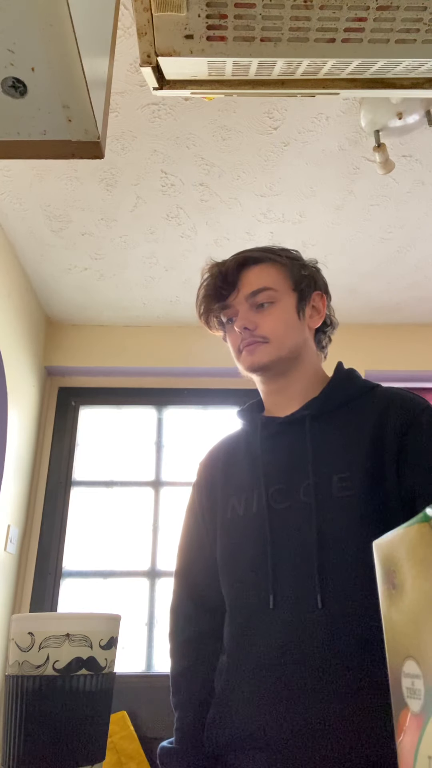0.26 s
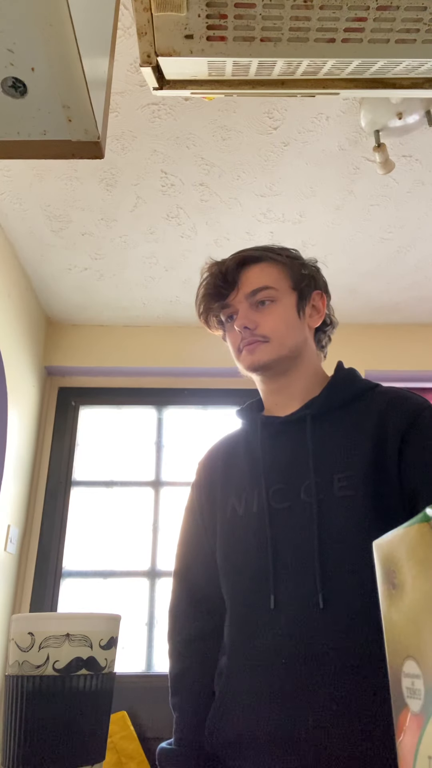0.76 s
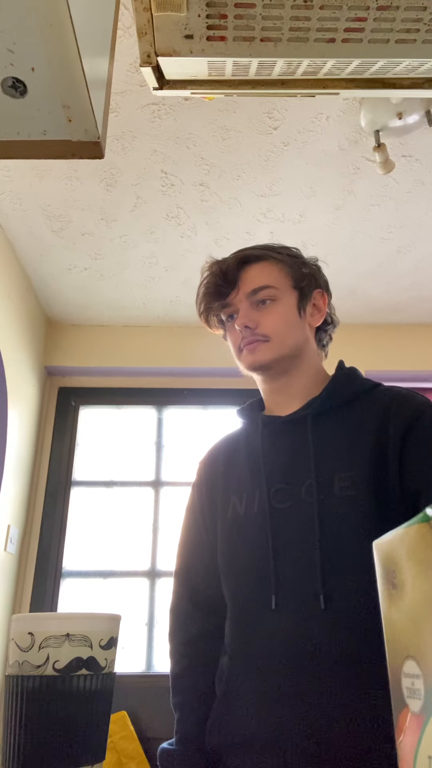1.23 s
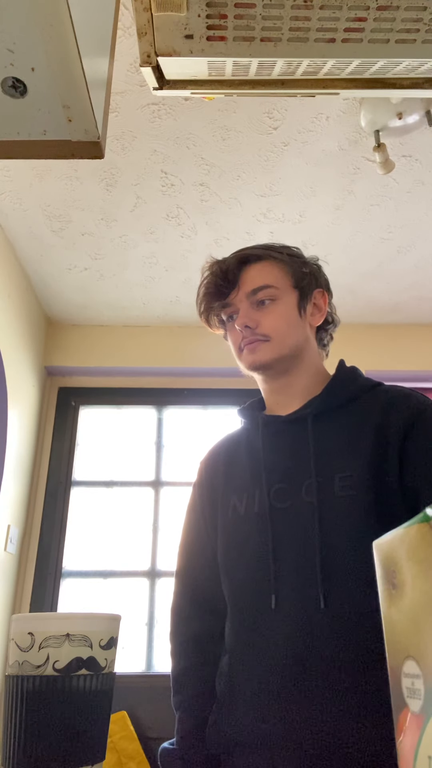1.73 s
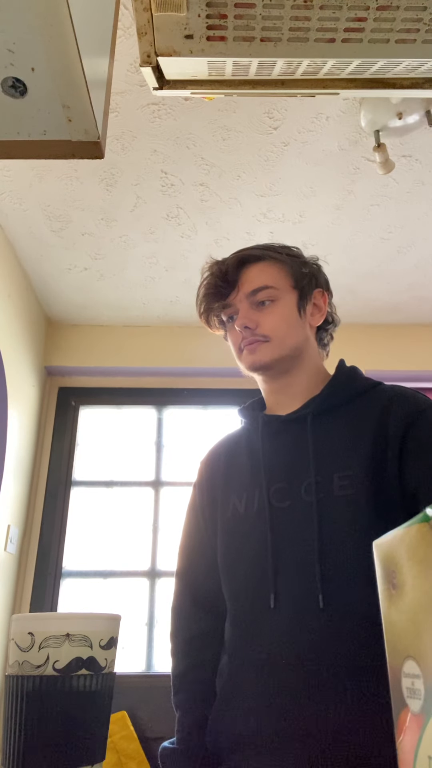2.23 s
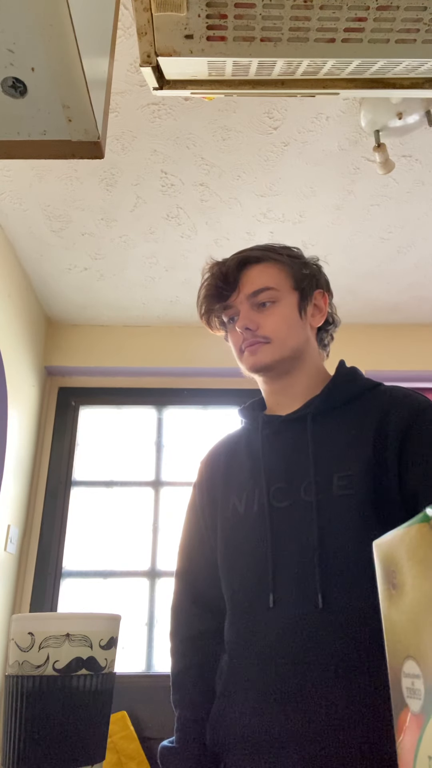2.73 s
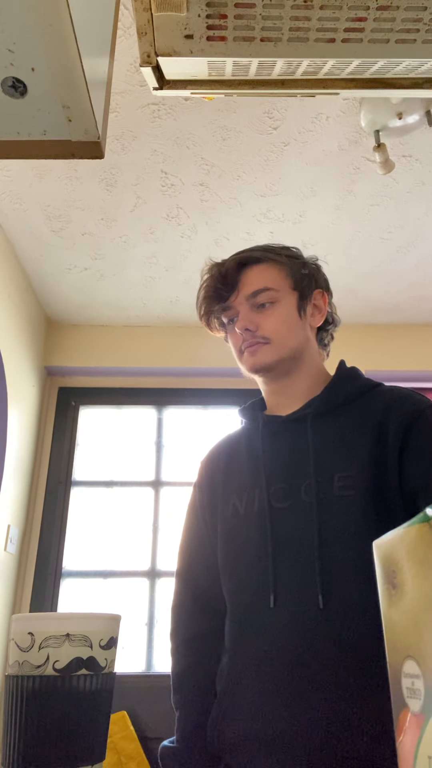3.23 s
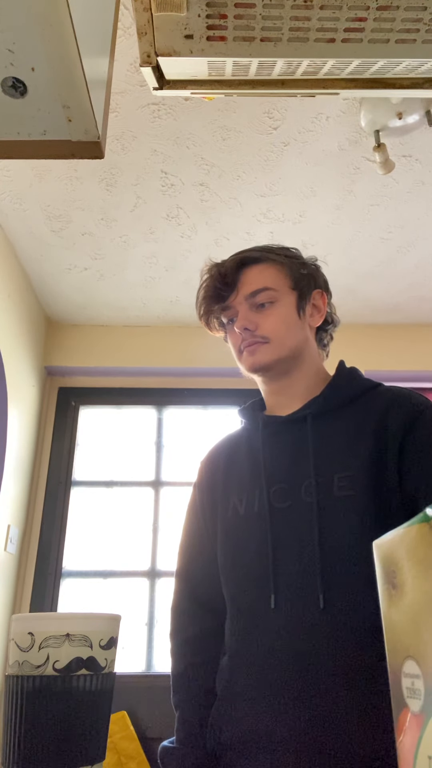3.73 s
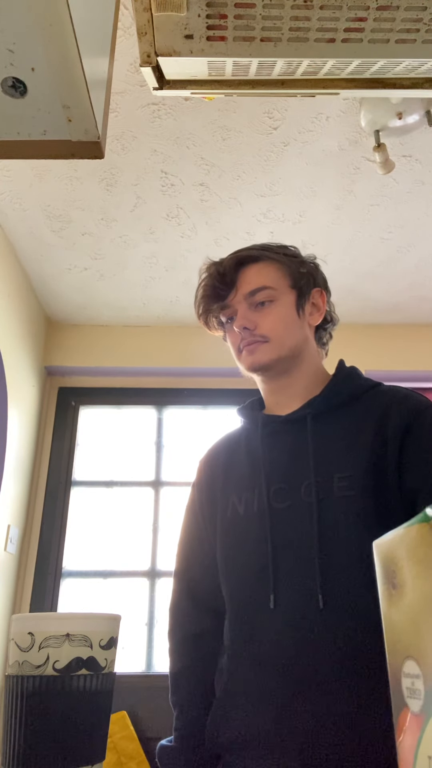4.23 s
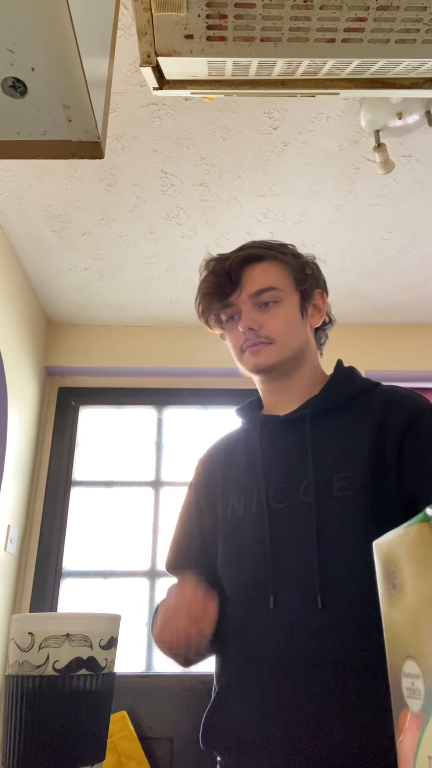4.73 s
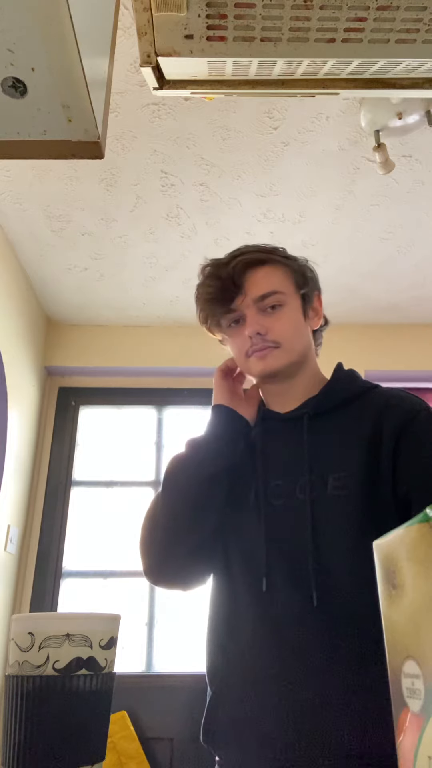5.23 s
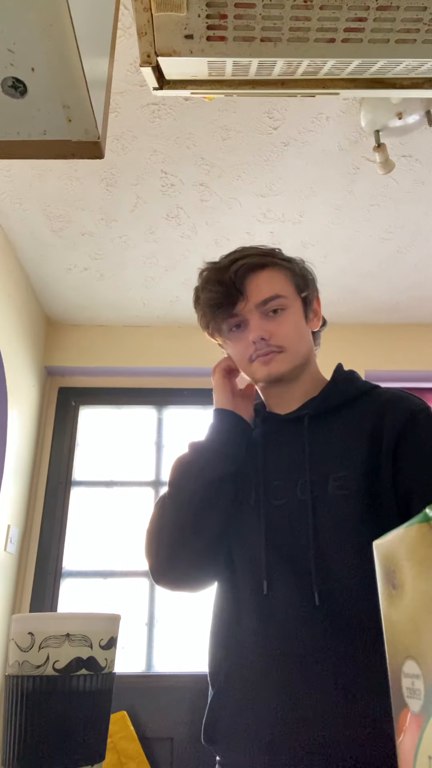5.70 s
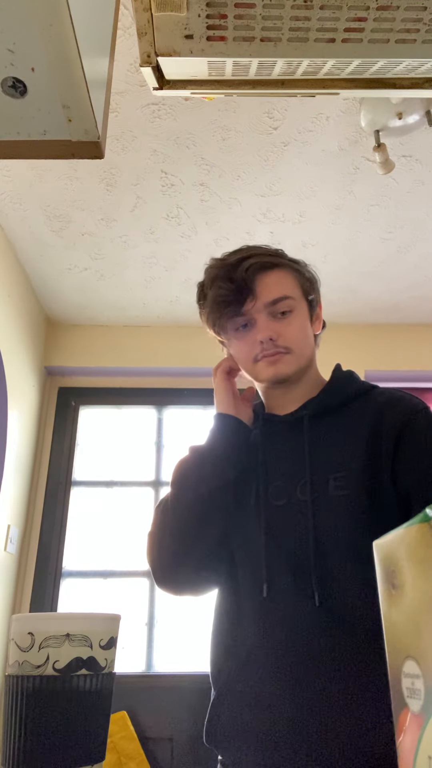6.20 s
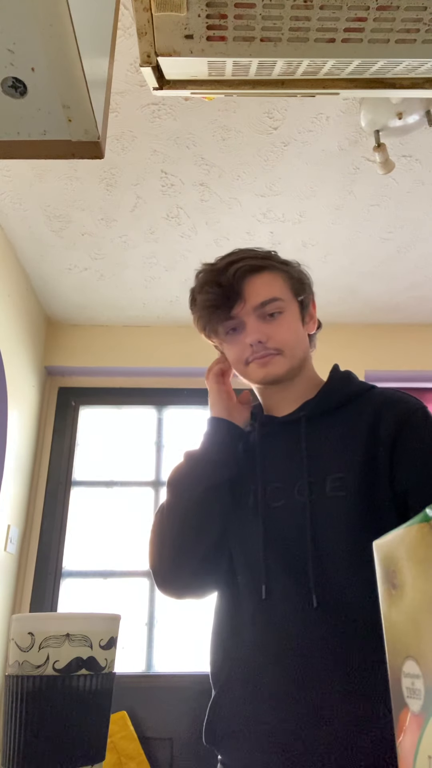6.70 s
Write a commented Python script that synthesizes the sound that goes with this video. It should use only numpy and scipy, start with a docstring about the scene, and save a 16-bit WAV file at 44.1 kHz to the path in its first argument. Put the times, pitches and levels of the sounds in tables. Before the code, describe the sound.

An electric kettle begins heating in a small kitchen, faint quickening ticks merging into a growing crackly sizzle with dull pops over a low fridge hum.

```python
"""An electric kettle starts to heat water in a small kitchen, over the beating hum of a fridge.
One spot on the hot plate ticks faster and faster, then a second; more join until the ticks merge into a sizzle.
Large steam bubbles collapse with dull pops; middling ones simmer low and the finest hiss on top.
Every collapse is a click or a dying burst of noise, filtered by the modes of the same kettle body.
Two faint squeaks slide upward as the plate warms; echoes of the kitchen and a low rumble surround it all."""
import sys
import numpy as np
from scipy import signal
from scipy.fft import rfft, irfft
from scipy.io import wavfile
from scipy.ndimage import uniform_filter1d

SR = 44100
rng = np.random.default_rng(int(sys.argv[2]) if len(sys.argv) > 2 else 0)


def dump_mix(stems):
    """Bounce the given channels to the path in sys.argv[1] as a 16-bit WAV at rate SR."""
    frames = np.atleast_2d(stems).T  # one column per channel
    limited = np.clip(frames, -1, 1)  # hard clip at full scale
    pcm = np.round(limited * 32767).astype(np.int16)
    wavfile.write(sys.argv[1], SR, pcm)


N = 306936
TIME = np.arange(N) / SR

# growing strength of the boiling, before each layer's own trim: start_s, sizzle_db, finest_bubbles_db
BOILING = [(0.0, -76, -87), (0.56, -61, -76), (0.81, -57, -62.5), (1.28, -51.5, -51.5), (2.0, -48.5, -47),
           (2.54, -42.5, -39), (2.95, -39.5, -37.5), (4.63, -32, -35), (5.46, -29.5, -34.5),
           (6.67, -28, -32.5), (6.96, -28.5, -34)]


def amp(db):
    """Decibels to gain."""
    return 10 ** (np.asarray(db) / 20)


def unit(x):
    """Scales to rms 1."""
    return x / np.sqrt(np.mean(x ** 2) + 1e-20)


def read(points, hz):
    """A spectrum table, joined on a log-frequency axis."""
    point_hz, value = np.transpose(points)
    return np.interp(np.log(hz + 1), np.log(point_hz + 1), value)


def curves(rows):
    """The columns of a time table, at every sample."""
    s, *columns = np.transpose(rows)
    return [np.interp(TIME, s, column) for column in columns]


def cut(x, hz, kind, order=2):
    """A causal low-, high- or band-pass."""
    return signal.sosfilt(signal.butter(order, hz, kind, fs=SR, output="sos"), x)


def ring(x, response):
    """Plays x through an impulse response."""
    return signal.oaconvolve(x, response)[:N]


def add(mix, s, sound):
    """Adds a sound at time s."""
    part = mix[max(round(s * SR), 0):][:len(sound)]
    part += sound[:len(part)]


def kettle_body(size=8192):
    """The kettle's answer to one collapse: narrow modes over a broad response, made causal."""
    # resonances of the kettle and its water: pitch_hz, width_hz, level_db
    mode_table = [(233.7, 30, -4.5), (280.5, 112, -7.5), (352, 29, -9), (404, 28, -11), (570.6, 56, -12),
                  (673, 80, -16), (864, 54, -12.5), (940.3, 42, -3), (983.7, 34, -3.5), (1625, 36, -4.5),
                  (1694, 58, -7.5), (1760, 11, -7), (1910, 58, -7.5), (2030, 70, -2.5), (2189, 54, 1),
                  (2393, 34, -2), (2432, 29, 0), (2938, 62, -2), (3012, 58, -0.5), (3073, 140, -4),
                  (3276, 77, -7), (3655, 93, -3.5), (3916, 73, -7.5), (4030, 130, -12), (4182, 117, -5),
                  (4510, 66, -11), (4800, 82, -8), (5056, 230, -10)]
    # broad response between the modes: frequency_hz, level_db
    shell_table = [(30, -42), (100, 3), (135, -9.5), (185, -28), (480, -25), (780, -23.5), (1100, -25.5),
                   (1350, -19.5), (1500, -19), (1750, -9.5), (2500, -6.5), (2700, -18), (3200, -10.5),
                   (4200, -10.5), (5500, -19.5), (7000, -26), (8700, -29.5), (9300, -31), (11500, -30.5)]
    hz = abs(np.fft.fftfreq(size, 1 / SR))
    power = amp(read(shell_table, hz)) ** 2
    for mode_hz, width_hz, db in mode_table:
        detuning = (hz - mode_hz) / width_hz
        power = power + amp(db) ** 2 / (1 + 2 * detuning ** 2) ** 2
    # the Hilbert transform of the log gain gives the minimum phase
    spectrum = np.exp(np.conj(signal.hilbert(np.log(power) / 2)))
    response = np.fft.ifft(spectrum).real[:size // 2]
    return response / np.linalg.norm(response)


def with_knock(body, dry_db):
    """Part of a collapse leaves through the open water without ringing any mode."""
    return body + amp(dry_db) * signal.unit_impulse(len(body))


def splash(t60, size=1500):
    """One collapse: the bubble shatters in a quick flutter of noise that falls 60 dB in t60 seconds."""
    return rng.standard_normal(size) * np.exp(-np.log(1000) * np.arange(size) / SR / t60)


def crest(x, size=176):
    """Scales a blow so that its loudest 4 ms have rms 1."""
    return x / np.sqrt(uniform_filter1d(x ** 2, size).max())


def blow(colour, t60, flutter_db):
    """One collapse through a colour: a sharp click, then the flutter of the shattering bubble."""
    flutter = splash(t60)
    flutter *= amp(flutter_db) / np.linalg.norm(flutter)  # energy against the click
    collapse = signal.unit_impulse(len(flutter)) + flutter
    return crest(signal.fftconvolve(colour, collapse))


def strikes(s, db):
    """Single clicks at the given times."""
    samples = np.clip(np.round(s * SR).astype(int), 0, N - 1)
    return np.bincount(samples, amp(db), N)


def collapses(per_s, spread_db, size=6001):
    """Random clicks of uneven size, whose power is steady over about a seventh of a second."""
    sizes = amp(spread_db * np.clip(rng.standard_normal(N), -2.5, 2.5))
    signs = rng.choice([-1, 1], N)
    clicks = sizes * signs * (rng.random(N) < per_s / SR)
    power = uniform_filter1d(uniform_filter1d(clicks ** 2, size), size // 2)
    return clicks / np.sqrt(abs(power) + 1e-6)


def scatter(clicks, colour, t60):
    """Turns every click into a splash of its own, of the same energy, which rings the kettle."""
    keep = np.exp(-2 * np.log(1000) / SR / t60)  # share of the power left after one sample
    power = signal.lfilter([1 - keep], [1, -keep], clicks ** 2 + 1e-20)
    return ring(np.sqrt(power) * rng.standard_normal(N), colour / np.linalg.norm(colour))


def early_ticks(body, level_db=-1.0, low_hz=900, top_hz=5500, dry_db=-9, t60=.018, flutter_db=2):
    """Tiny bubbles leave the first two hot spots, each quickening, their ticks interleaved and mostly
    growing louder: a dry tick and a little ring."""
    # single ticks, before the trim level_db: start_s, level_db
    tick_table = [(.174, -76), (.224, -75), (.276, -77), (.317, -70), (.357, -65), (.395, -65), (.426, -61),
                  (.46, -63), (.493, -60), (.522, -62), (.537, -57), (.551, -62), (.578, -62), (.601, -59),
                  (0.621, -54.5), (0.641, -54), (.66, -53), (0.68, -56), (.688, -52), (.7, -53), (.72, -58),
                  (.744, -51.5), (.765, -54), (.785, -55), (.797, -51), (.824, -52), (0.848, -52),
                  (.866, -51), (.892, -50), (.907, -53), (0.924, -50.5), (.938, -51), (.952, -55),
                  (.976, -50), (.99, -51), (1.014, -45.5), (1.036, -50), (1.052, -46), (1.076, -51),
                  (1.088, -45.5), (1.123, -56), (1.159, -47), (1.192, -43), (1.215, -48), (1.233, -42),
                  (1.264, -48), (1.287, -48), (1.316, -51), (1.342, -50), (1.365, -52), (1.382, -47),
                  (1.412, -43), (1.43, -47), (1.456, -46), (1.48, -45), (1.5, -48), (1.521, -47),
                  (1.543, -48), (1.563, -49), (1.601, -41.5), (1.659, -41), (1.686, -43)]
    colour = cut(cut(with_knock(body, dry_db), low_hz, "high"), top_hz, "low")
    out = np.zeros(N)
    for s, db in tick_table:
        add(out, s, blow(colour, t60, flutter_db) * amp(db + level_db))
    return out


def hot_spots(body, level_db=25, quickening=.3, jitter=.1, spread_db=2.5,
              low_hz=900, top_hz=6000, t60=0.024, count=600):
    """Each further spot sheds bubbles at its own pace, which quickens as the plate warms."""
    # further hot spots, before the trim level_db: start_s, first_ticks_per_s, level_db
    spot_table = [(1.58, 32, -57), (1.71, 18.8, -47.5), (1.899, 32, -54.5), (2.329, 26, -43),
                  (2.551, 48, -53.5)]
    clicks = np.zeros(N)
    for start, per_s, db in spot_table:
        slip, size = rng.standard_normal((2, count))
        even = np.cumsum(np.exp(jitter * slip)) / per_s  # tick times at an unhurried pace
        # the pace grows by a factor e in 1 / quickening seconds
        s = start + np.log1p(quickening * (even - even[0])) / quickening
        heard = s < TIME[-1]
        clicks += strikes(s[heard], db + level_db + spread_db * size[heard])
    return scatter(clicks, cut(body, [low_hz, top_hz], "band", order=1), t60)


def sizzle(body, level_db=1, spread_db=1.5, low_hz=520, top_hz=6200, t60=0.0058, surge_db=0.66, surge_hz=14):
    """Ever more small bubbles collapse, in little surges, until single ticks merge."""
    first_per_s, doubling_s = 600, 2.2
    cold_db, warm_s = -37, .68  # the swarm starts low and fills up with this time constant
    per_s = first_per_s * 2 ** (TIME / doubling_s)
    share_db = cold_db * np.exp(-TIME / warm_s)
    colour = cut(cut(body, low_hz, "high", order=1), top_hz, "low")
    surges = unit(cut(rng.standard_normal(N), surge_hz, "low"))
    level = amp(curves(BOILING)[0] + share_db + level_db + surge_db * surges)
    return scatter(collapses(per_s, spread_db) * level, colour, t60)


def pops(body, thump_db=-1, ring_db=-2, snap_db=-4, dry_db=-7, low_hz=190, dull_hz=520,
         ring_hz=770, snap_hz=1480, top_hz=3000, lag_s=0.00204, flutter_db=8):
    """A large bubble snaps and rings the kettle wall, and a moment later its thump stirs the low modes."""
    # the largest bubbles, before the trims above: start_s, thump_db, ring_db, snap_db
    pop_table = [(1.636, -48, -52.5, -37), (1.775, -55, -52, -43), (2.012, -47, -48, -38),
                 (2.156, -48.5, -42.5, -37), (2.359, -50.0, -45, -35), (2.504, -64.0, -45.5, -46.5),
                 (2.57, -46, -38, -35), (2.628, -43.5, -43, -29), (2.692, -55, -55, -35),
                 (2.751, -53, -52, -34.5), (2.821, -36, -42, -24), (2.846, -61, -58, -32),
                 (2.871, -39.5, -40, -34), (3.057, -33.5, -43, -33), (3.131, -57, -48, -36),
                 (3.213, -40, -40, -28), (3.249, -41.5, -38.5, -33), (3.365, -38.0, -37, -26.5),
                 (3.467, -34.5, -43.5, -35), (3.495, -37.5, -33.5, -39), (3.589, -33.5, -34.5, -23.5),
                 (3.685, -41, -38, -30.5), (3.722, -40, -31.5, -25.5), (3.774, -30, -28.5, -21.5),
                 (3.829, -30.5, -29.5, -35), (3.874, -43, -48, -26), (3.981, -56, -36, -32),
                 (4.032, -38.5, -41.0, -43), (4.185, -42, -43, -23), (4.242, -33, -34, -39),
                 (4.31, -41, -31.5, -31.5), (4.353, -27.5, -23.5, -20), (4.379, -29, -43, -31),
                 (4.464, -40, -51, -23), (4.544, -36, -50, -24), (4.589, -34.5, -40.0, -19.5),
                 (4.647, -36.5, -41, -35.0), (4.71, -28.5, -27.5, -34.0), (4.785, -34.5, -30, -40),
                 (4.846, -28, -34, -20), (4.939, -23, -26.5, -19), (5.021, -32, -40, -32.0),
                 (5.09, -27, -30, -21), (5.253, -36.5, -27, -20), (5.308, -36.0, -38, -23),
                 (5.335, -38.5, -42, -21), (5.358, -46, -38, -28), (5.435, -33, -26, -25.0),
                 (5.543, -33, -40, -18.5), (5.568, -25.5, -25.5, -21), (5.67, -38.5, -27.5, -23),
                 (5.702, -39, -34, -28), (5.747, -28.5, -29, -19.5), (5.83, -38, -34, -26),
                 (5.899, -23.5, -22.5, -43), (5.936, -33, -46, -23), (6.192, -30.5, -22, -17.5),
                 (6.271, -34, -28, -31.5), (6.348, -32, -38, -37), (6.438, -34, -46, -23),
                 (6.509, -29, -23, -16.5), (6.673, -30.0, -21, -24), (6.735, -28, -25.5, -19),
                 (6.819, -32, -39, -16.5), (6.861, -36, -28, -29), (6.914, -41, -33, -21)]
    snap_t60, thump_t60 = .04, .04  # s, the ring flutters as long as the snap
    struck = with_knock(body, dry_db)
    low = cut(cut(struck, [low_hz, ring_hz], "band", order=3), dull_hz, "low", order=1)
    wall = cut(struck, [ring_hz, snap_hz], "band")
    high = cut(struck, [snap_hz, top_hz], "band")
    out = np.zeros(N)
    for s, low_db, wall_db, high_db in pop_table:
        add(out, s, blow(high, snap_t60, flutter_db) * amp(high_db + snap_db))
        add(out, s, blow(wall, snap_t60, flutter_db) * amp(wall_db + ring_db))
        add(out, s + lag_s, blow(low, thump_t60, flutter_db) * amp(low_db + thump_db))
    return out


def simmer(body, level_db=-2, per_s=260, spread_db=1.5, low_hz=180, top_hz=1000, t60=0.0015):
    """Middling bubbles close more slowly and so stir only the low modes."""
    # strength of the simmer, before the trim level_db: start_s, level_db
    simmer_table = [(0, -93), (.6, -70), (1.5, -67.5), (2.3, -99), (3.8, -46.5), (5.5, -40), (6.96, -39)]
    clicks = collapses(per_s, spread_db) * amp(curves(simmer_table)[0] + level_db)
    colour = cut(cut(body, low_hz, "high", order=2), top_hz, "low", order=4)
    return scatter(clicks, colour, t60)


def fizz(body, level_db=-9, per_s=3000, spread_db=4, low_hz=6000, t60=0.019):
    """The finest bubbles collapse so densely that they make a smooth hiss on top."""
    clicks = collapses(per_s, spread_db) * amp(curves(BOILING)[1] + level_db)
    return scatter(clicks, cut(body, low_hz, "high", order=3), t60)


def squeaks(rise_hz_per_s=27000, rough=.02, rough_hz=400):
    """Faint whistles slide upward as the plate warms, roughened by a random waver of pitch."""
    # thin squeaks: start_s, length_s, start_pitch_hz, level_db
    squeak_table = [(1.28, .045, 8400, -67), (1.343, .04, 8600, -68)]
    out = np.zeros(N)
    for s, length, start_hz, db in squeak_table:
        t = np.arange(0, length, 1 / SR)
        waver = unit(cut(rng.standard_normal(N), rough_hz, "low"))[:len(t)]
        hz = (start_hz + rise_hz_per_s * t) * (1 + rough * waver)
        swell = np.sin(np.pi * t / length)
        add(out, s, amp(db) * swell * np.sin(2 * np.pi * np.cumsum(hz) / SR))
    return out


def echoes(wet_db=-8, near_db=-5, near_t60=0.1, low_hz=300, size=16384):
    """Quick reflections from counter and walls and a short tail, as an impulse response per port."""
    # reverberation of the kitchen: frequency_hz, t60_s
    decay_table = [(150, .25), (1000, .22), (3000, .16), (10000, .14)]
    # share of the reverberation that both ports hear alike: frequency_hz, share (0-1)
    likeness_table = [(100, 1), (330, 0.83), (550, 0), (2000, 0), (4200, 0), (6700, 0.33), (7600, 1),
                      (9500, 0), (12000, 0.96)]
    hz, t, noise = signal.stft(rng.standard_normal((2, size)), SR, nperseg=256)
    decay = amp(-60 * t / read(decay_table, hz)[:, None])
    tail = signal.istft(noise * decay, SR, nperseg=256)[1][:, :size]
    near = np.array([splash(near_t60, size), splash(near_t60, size)])
    both = (amp(wet_db) * unit(tail) + amp(near_db) * unit(near)) / np.sqrt(size)
    left, other = rfft(cut(both, low_hz, "high", order=1))
    alike = np.clip(read(likeness_table, np.fft.rfftfreq(size, 1 / SR)), 0, 1)
    right = alike * left + np.sqrt(1 - alike ** 2) * other
    return irfft(np.array([left, right]))


def kitchen(x, direct_db=-1.5, roam_hz=3, count=4):
    """The bubbles roam over the plate, so the pattern of echoes drifts slowly at a steady strength."""
    out = amp(direct_db) * np.array([x, x])
    shares = cut(rng.standard_normal((count, N)), roam_hz, "low")
    for share in shares / np.linalg.norm(shares, axis=0):
        out += [ring(x * share, port) for port in echoes()]
    return out


def fridge(motor_hz=97.7, beat_hz=2.26, loudest_s=0.28, mains_db=-9):
    """A compressor motor slips just behind the mains hum, so that the two beat."""
    # strength of the hum: start_s, level_db
    hum_table = [(0, -57.5), (1.9, -58), (2.7, -54), (6.9, -54)]
    turns = motor_hz * TIME
    motor = np.sin(2 * np.pi * turns)
    mains = amp(mains_db) * np.sin(2 * np.pi * (turns + beat_hz * (TIME - loudest_s)))
    return unit(motor + mains) * amp(curves(hum_table)[0])


def room_air(level_db=-63, apart_db=-16):
    """Low rumble of the house: shaped noise, nearly the same at both ports."""
    # spectrum of the quiet kitchen, before scaling to level_db: frequency_hz, density_db (per Hz)
    air_table = [(20, -18), (45, -17), (65, -3.5), (85, -13), (112, -13.5), (134, -6), (165, -21.5),
                 (300, -29), (600, -32.5), (1400, -36.5), (1900, -39), (2200, -33), (2700, -54),
                 (6000, -53), (12000, -59)]
    spectrum = amp(read(air_table, np.fft.rfftfreq(N, 1 / SR)))
    shared, left, right = irfft(rfft(rng.standard_normal((3, N))) * spectrum, N)
    return amp(level_db) * (unit(shared) + amp(apart_db) * unit(np.array([left, right])))


def scene():
    """All the bubbles ring one kettle in the kitchen, over the fridge and the rumble."""
    body = kettle_body()
    ticking = early_ticks(body) + hot_spots(body)
    boiling = sizzle(body) + pops(body) + simmer(body) + fizz(body)
    return kitchen(ticking + boiling + squeaks()) + fridge() + room_air()


def record(dry):
    """Two microphone ports, the left one nearer to the kettle; then the band limit."""
    # level between the ports: frequency_hz, left_minus_right_db
    balance_table = [(40, 3), (100, 1.5), (200, 3), (330, 4.5), (420, 8.5), (540, 11), (730, 11.5),
                     (950, 8.5), (1300, 0), (1600, 4), (2300, 2), (2950, 10.5), (3600, 1.5), (5300, 4),
                     (8000, -1.5), (12000, 1)]
    # phase between the ports: frequency_hz, left_lead_radians
    phase_table = [(300, 0), (780, -1.3), (1100, -.2), (1500, 0), (2300, -.9), (3450, -1), (4200, -.7),
                   (4800, -2.7), (5400, -2.2), (6400, -.3), (8000, -.3), (10000, -1.9), (12000, -2.9)]
    edge_hz = 12300
    hz = np.fft.rfftfreq(2 * N, 1 / SR)
    sides = np.array([[.5], [-.5]])  # half of each difference goes to either port
    ports = amp(sides * read(balance_table, hz)) * np.exp(1j * sides * read(phase_table, hz))
    heard = irfft(rfft(dry, 2 * N) * ports)[:, :N]
    band_limit = signal.firwin(255, edge_hz, window=("kaiser", 9), fs=SR)
    return signal.oaconvolve(heard, band_limit[None], "same")


dry = scene()
out = record(dry)
dump_mix(out)
```